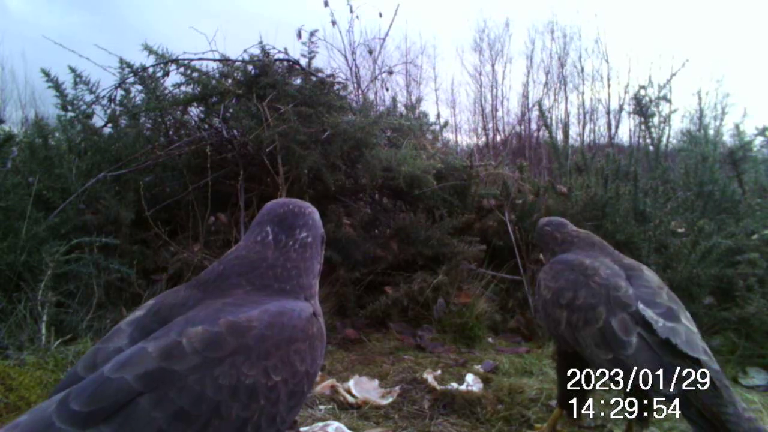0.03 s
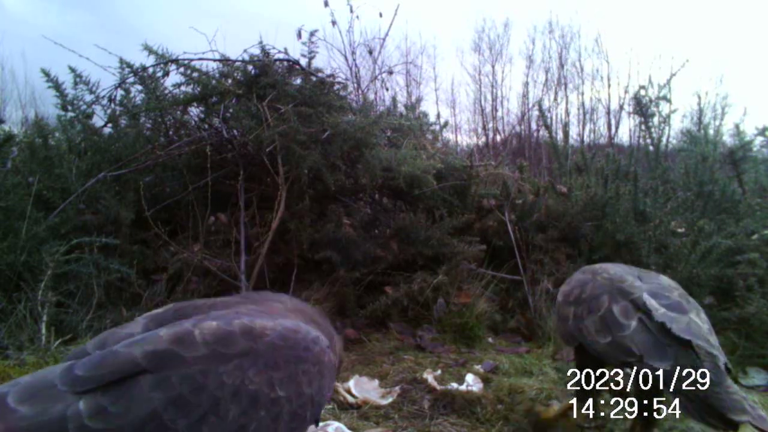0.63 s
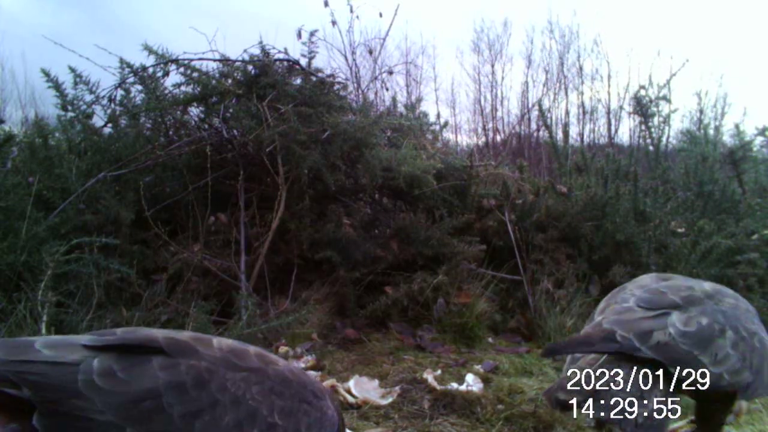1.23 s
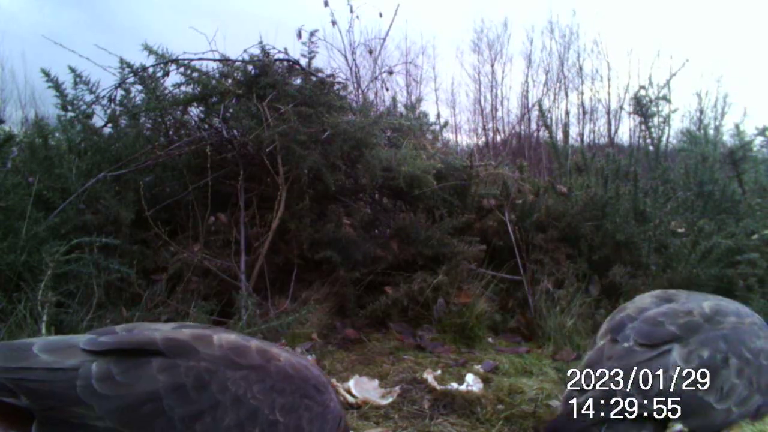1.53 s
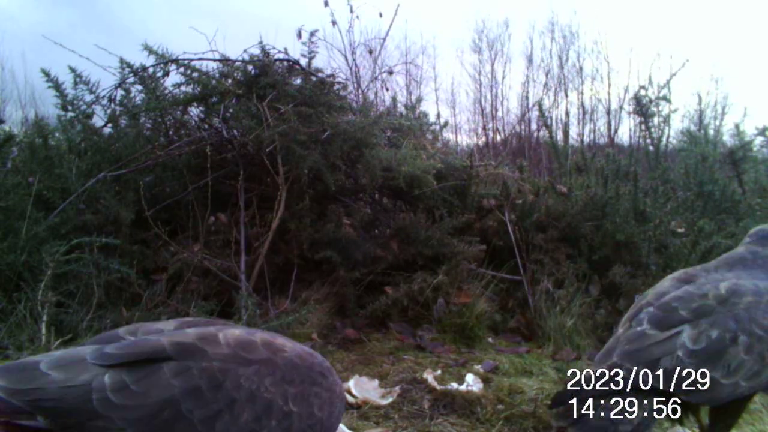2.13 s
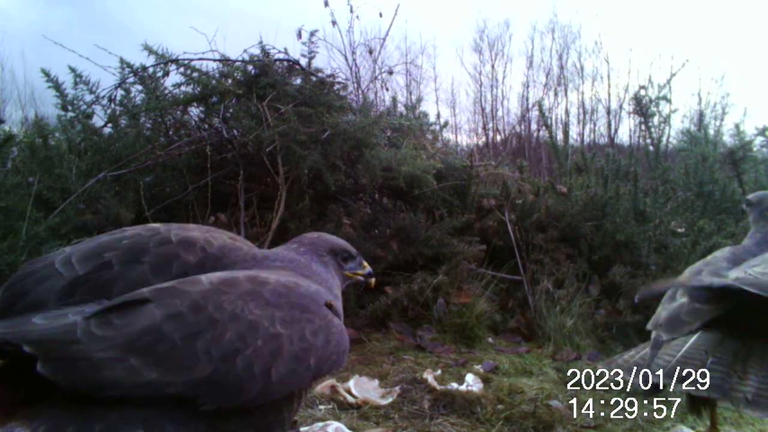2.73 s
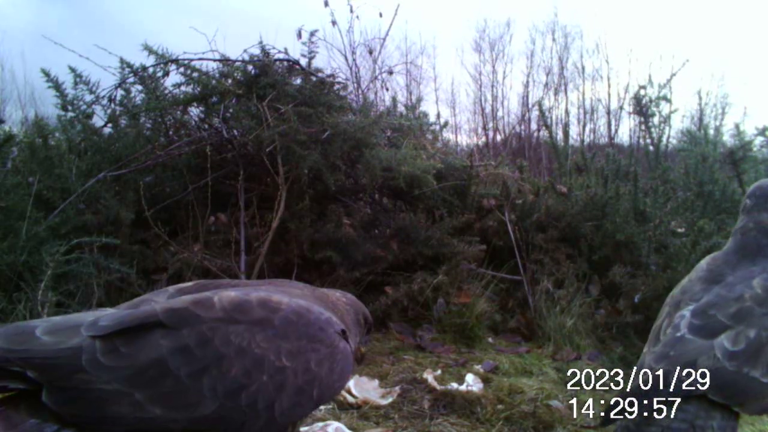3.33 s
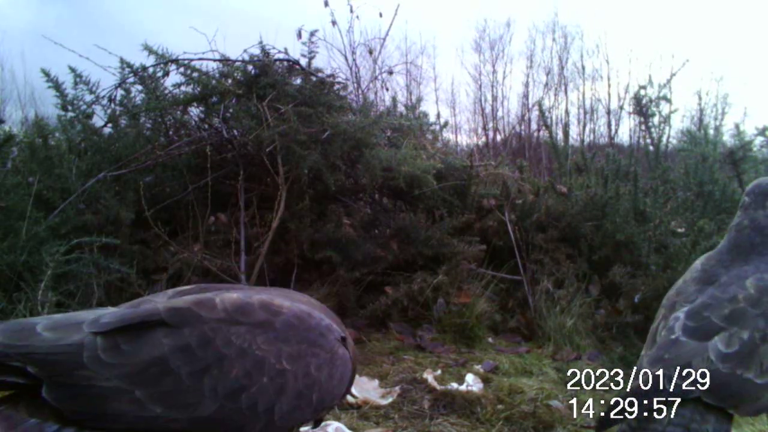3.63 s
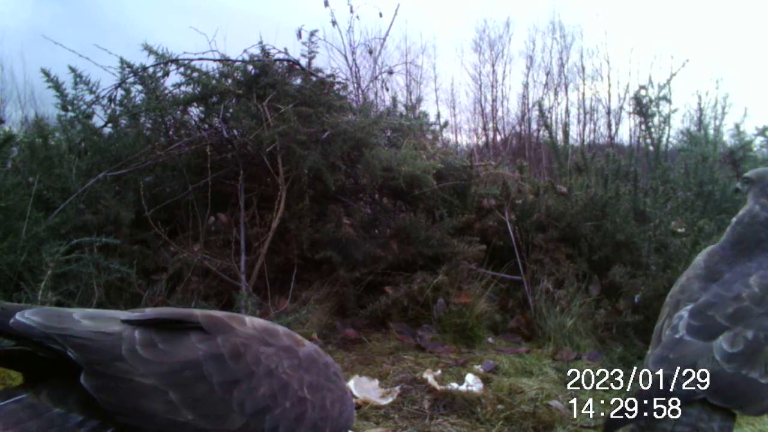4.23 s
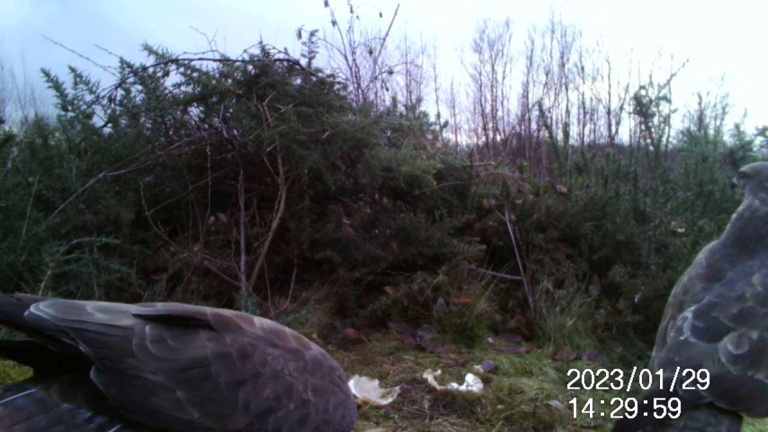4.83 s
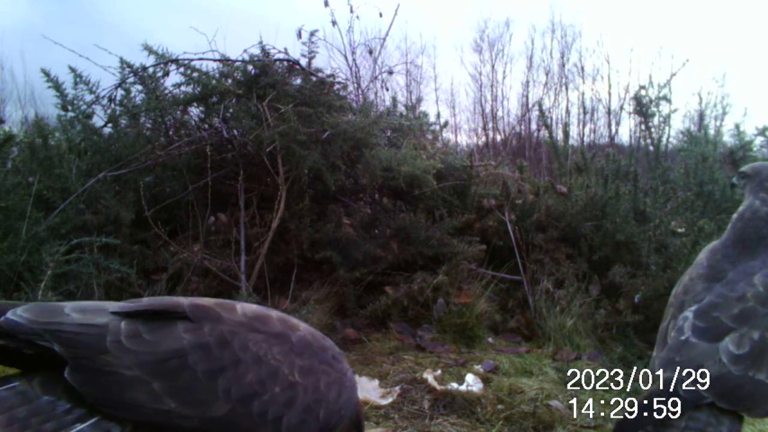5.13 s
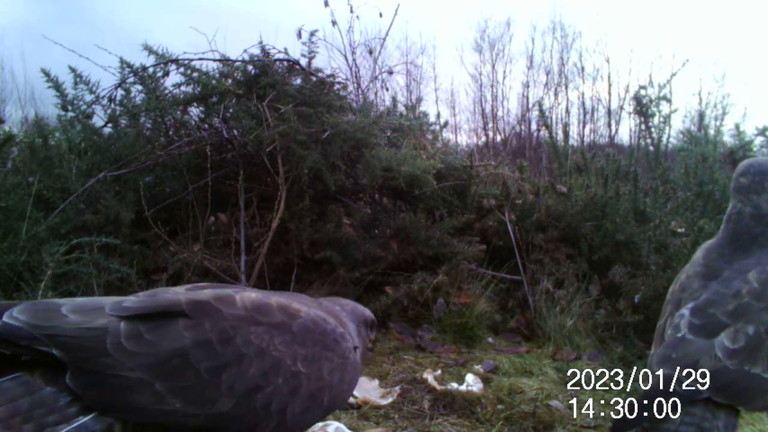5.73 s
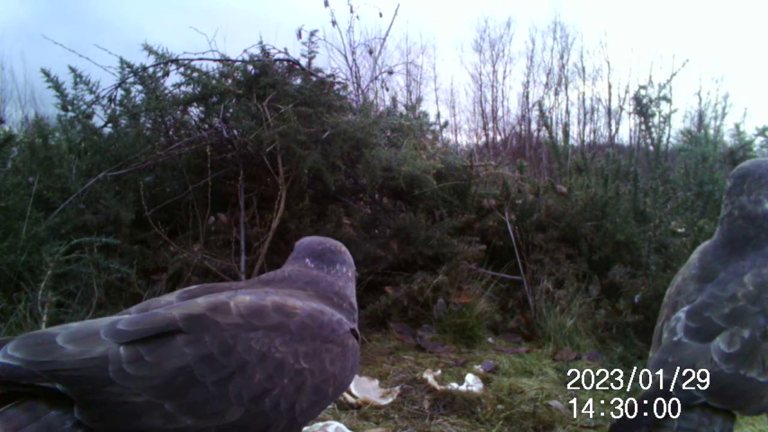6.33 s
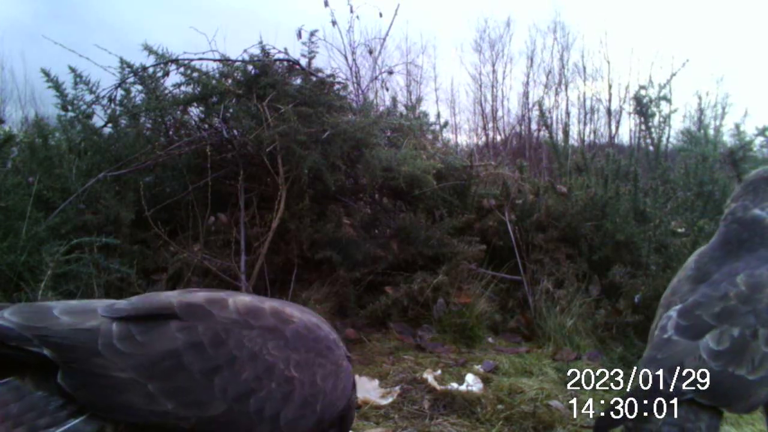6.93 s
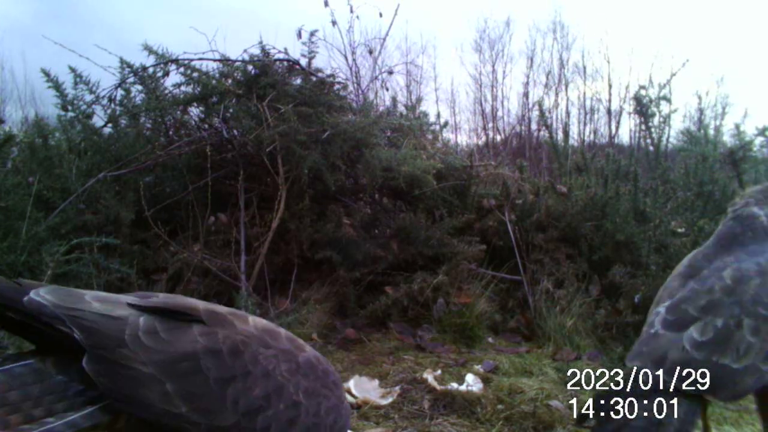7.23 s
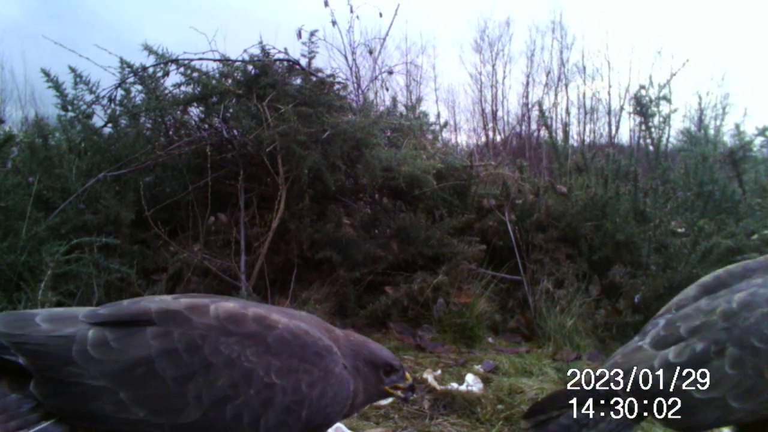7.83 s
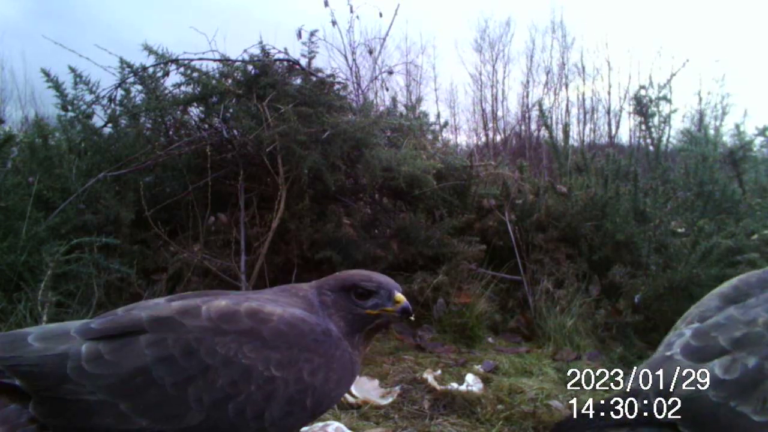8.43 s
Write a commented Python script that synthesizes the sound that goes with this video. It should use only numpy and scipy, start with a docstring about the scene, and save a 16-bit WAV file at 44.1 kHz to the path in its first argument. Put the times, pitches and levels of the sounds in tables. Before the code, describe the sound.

A steady wind-like rush and low rumble fill an outdoor clearing. A small bird peeps faintly far off. Feathers rustle briefly and a buzzard near the microphone gives one soft, high mew. A few tiny beak or twig ticks follow. Near the end the buzzard lets out a hoarse rising squeal, then a louder, harsh, rattling scream. The sound is slightly dull and lo-fi.

```python
"""Two buzzards feeding in a clearing

Over a steady wind-like rush, a buzzard close by gives a soft mew, later a rising squeal and a harsh
scream: each a whistle that a flutter of the syrinx chops into pulses. Feathers rustle, a beak ticks,
a small bird peeps far off. The bushes echo the calls faintly, and a low sample rate dulls the top."""
import sys
import numpy as np
from scipy import signal
from scipy.fft import rfft, irfft, next_fast_len
from scipy.io import wavfile
from scipy.ndimage import uniform_filter1d

SR = 44100
rng = np.random.default_rng(int(sys.argv[2]) if len(sys.argv) > 2 else 0)


def persist_wave(psi):
    """Save psi, clipped to +-1, as 16-bit WAV."""
    counts = np.round(np.clip(psi, -1, 1) * 32767).astype(np.int16)
    wavfile.write(sys.argv[1], SR, np.atleast_2d(counts).T)


N = 373527
TIME = np.arange(N) / SR


def from_db(db):
    """Decibels to gain."""
    return 10 ** (np.asarray(db) / 20)


def rms_one(x):
    """Scale to unit power."""
    return x / np.sqrt(np.mean(x ** 2) + 1e-20)


def in_time(rows):
    """One curve at every sample for each column after the time column."""
    s, *columns = np.transpose(rows)
    return [np.interp(TIME, s, c) for c in columns]


def gate(rows, fade_s=0.0048):
    """Open while a curve lasts, with short fades outside it."""
    return np.clip(np.minimum(TIME - rows[0][0], rows[-1][0] - TIME) / fade_s + 1, 0, 1)


def drift(rate_hz):
    """A smooth random wander of unit power."""
    lowpass = signal.butter(2, rate_hz, fs=SR, output="sos")
    return rms_one(signal.sosfilt(lowpass, rng.standard_normal(N + SR))[SR:])


def resonance(x, hz, width_hz):
    """Two-pole resonance with unity gain at its peak."""
    r = np.exp(-np.pi * width_hz / SR)
    feedback = [1, -2 * r * np.cos(2 * np.pi * hz / SR), r * r]
    return signal.lfilter(np.array([1, 0, -1]) * (1 - r * r) / 2, feedback, x + 1e-18)


def hiss(hz, width_hz):
    """Noise sent twice through one resonance."""
    return rms_one(resonance(resonance(rng.standard_normal(N), hz, width_hz), hz, width_hz))


def coloured_noise(colour):
    """Noise with the given spectrum and nothing above its last point."""
    size = next_fast_len(N)
    hz = np.arange(size // 2 + 1) * SR / size
    points_hz, points_db = np.transpose(colour)
    gain = from_db(np.interp(np.log(hz + 1), np.log(points_hz), points_db)) * (hz < points_hz[-1])
    return rms_one(irfft(rfft(rng.standard_normal(size)) * gain, size)[:N])


def background(hum_hz=60.75, hum_db=-47):
    """The bed: a steady mid-range rush over a low rumble and a faint wavering hum."""
    # Slow changes in the bed. Each row: time in seconds, rush level in dB, rumble level in dB.
    levels = [(0, -27.5, -31), (.5, -26.5, -33), (1.6, -27, -33), (2.25, -27.5, -34), (2.7, -26.5, -34.5),
              (3.3, -27, -34), (4.3, -27.5, -34.5), (5.4, -27, -35), (7.2, -27.5, -34.5), (8.47, -27, -35)]
    # Tone of the two noises. Each row: frequency in Hz, relative level in dB.
    rush_colour = [(300, -22.5), (520, -15), (620, -10), (730, -3.5), (910, 1), (1200, -2.5), (1500, -.5),
                   (1780, -2), (2150, -10), (2600, -16), (3300, -22), (4100, -29.5), (5100, -32.5),
                   (5500, -37)]
    rumble_colour = [(12, -9), (25, -3), (42, -2), (75, 0), (110, -4.5), (160, -7.5), (270, -9),
                     (360, -14.5), (450, -14.5), (540, -24.5), (900, -42.5)]
    rush_db, rumble_db = in_time(levels)
    rush = from_db(rush_db) * coloured_noise(rush_colour)
    rumble = from_db(rumble_db) * coloured_noise(rumble_colour)
    hum_phase = 2 * np.pi * np.cumsum(hum_hz + 2.3 * drift(4)) / SR
    return rush + rumble + from_db(hum_db) * np.sqrt(2) * np.sin(hum_phase)


def small_bird(hz=4183.7, rise_10_db_s=0.004177, t60_s=0.1305):
    """Thin, distant peeps on one pitch that swell quickly and die away."""
    # Each row: time of a peep's peak in seconds, level in dB.
    peeps = [(.069, -46.5), (.101, -47), (.195, -52)]
    envelope = np.zeros(N)
    for s, level_db in peeps:
        below_peak_db = np.maximum((s - TIME) / rise_10_db_s * 10, (TIME - s) / t60_s * 60)
        envelope += from_db(level_db - np.minimum(below_peak_db, 200))
    return envelope * np.sqrt(2) * np.sin(2 * np.pi * hz * TIME)


def feathers():
    """Feathers slide over each other in quick, uneven brushes as a bird shifts its wings."""
    # Each row: time in seconds, rustle level in dB.
    rustle = [(2.1, -75), (2.28, -67.5), (2.35, -52.5), (2.41, -65.5), (2.45, -57.5), (2.58, -73.5),
              (2.68, -54), (2.78, -68)]
    level_db, = in_time(rustle)
    return from_db(level_db + 3 * drift(90)) * gate(rustle) * hiss(4800, width_hz=2200)


def ticks(attack_s=0.00089):
    """Beak and twigs give tiny cracks that die within milliseconds."""
    # Each row: start in seconds, level in dB, pitch in Hz, seconds to fall by 60 dB.
    cracks = [(2.188, -44.5, 5300, 0.017), (2.2121, -37.5, 4000, .013), (2.5475, -40, 4764, 0.01936),
              (4.4026, -30.5, 4989, 0.01302), (5.3328, -41.5, 3800, .012), (6.254, -39.5, 3596, .01)]
    out = np.zeros(N)
    for s, level_db, hz, t60_s in cracks:
        age = np.maximum(TIME - s, 0)
        envelope = np.minimum(age / attack_s, 1) * from_db(-60 * np.minimum(age / t60_s, 2))
        out += from_db(level_db) * envelope * hiss(hz, width_hz=1200)
    return out


def bushes(x):
    """The scrub throws back a few weak reflections."""
    # Each row: delay in seconds, echo level in dB.
    echoes = [(0.02, -34.5), (.047, -37.5), (.083, -43.5), (.135, -42)]
    return sum(from_db(level_db) * np.interp(TIME - s, TIME, x, left=0) for s, level_db in echoes)


def syrinx(call, rough, flutter_hz, chop, swing_hz, lag, jitter, uneven_db, rasp_db, waver_hz):
    """The buzzard's voice: a whistle whose loudness and pitch swing with every flutter."""
    pitch_hz, level_db = in_time(call)
    # the rougher the call, the less regular the flutter
    cycles = np.cumsum(flutter_hz * np.exp(jitter * np.sqrt(rough) * drift(160))) / SR
    flutter_phase = 2 * np.pi * cycles
    opening = 1 - np.clip(chop * rough, 0, 1) * np.cos(flutter_phase)
    # every pulse has a strength and a pitch of its own
    pulse = cycles.astype(int) % SR
    per_pulse = rng.uniform(-0.91, 1, (SR, 2))[pulse].T
    strength, detune = uniform_filter1d(per_pulse, size=40, axis=1)
    opening *= from_db(uneven_db * np.sqrt(rough) * strength)
    opening /= np.sqrt(uniform_filter1d(opening ** 2, size=700) + 1e-9)  # hold the power steady
    hz = pitch_hz + rough * (waver_hz * detune - swing_hz * np.cos(flutter_phase - lag))
    envelope = np.sqrt(2) * from_db(level_db) * opening
    envelope /= (1 + (envelope / .76) ** 6) ** (1 / 6)  # the membrane can swing only so far
    whistle = envelope * np.sin(2 * np.pi * np.cumsum(hz) / SR)
    # turbulence at the syrinx rings in the throat
    rasp = from_db(level_db + rasp_db) * rough * np.sqrt(opening) * hiss(5300, width_hz=830)
    return gate(call) * (whistle + rasp)


def mew(settled_hz=346.35, start_extra_hz=380.44, settle_s=0.056):
    """A soft arched note, hoarse with a flutter that starts fast and settles."""
    # Each row: time in seconds, pitch in Hz, level in dB.
    call = [(2.645, 3340, -46), (2.66, 3230, -40.5), (2.683, 3761, -34), (2.718, 4026, -34.5),
            (2.762, 3892, -31.5), (2.8, 3864, -35), (2.86, 3887, -36.5), (2.905, 3838, -36),
            (2.953, 3300, -41.5)]
    # How deeply the flutter bites. Each row: time in seconds, roughness from 0 to 1.
    roughness = [(2.66, 0.02), (2.703, 0.5), (2.72, 0.13), (2.848, 0.5), (2.87, 0.13)]
    rough, = in_time(roughness)
    age = np.maximum(TIME - call[0][0], 0)
    flutter_hz = settled_hz + start_extra_hz * np.exp(-age / settle_s)
    return syrinx(call, rough, flutter_hz, chop=.985, swing_hz=390, lag=.1,
                  jitter=.1, uneven_db=4, rasp_db=-25.5, waver_hz=130)


def squeal():
    """A rising whistle that turns hoarse as it climbs and ends in a falling yelp."""
    # The climb and the yelp. Each row: time in seconds, pitch in Hz, level in dB.
    rise_call = [(7.012, 2779, -44.5), (7.06, 3858, -31), (7.097, 4012, -23.5), (7.118, 4170, -17.5),
                 (7.148, 4202, -33), (7.18, 4540, -26), (7.215, 4550, -42), (7.255, 4835, -22),
                 (7.295, 4903, -14.5), (7.34, 4871, -16), (7.369, 5300, -15), (7.381, 5030, -15),
                 (7.388, 5490, -34.5), (7.424, 5471, -36.5)]
    yelp_call = [(7.429, 5080, -29.5), (7.4325, 4588, -17.5), (7.435, 4332, -14.5), (7.438, 4100, -33),
                 (7.444, 3402, -36.5)]
    # Hoarseness of the climb. Each row: time in seconds, roughness from 0 to 1.
    roughness = [(7.06, .22), (7.11, .02), (7.125, .05), (7.14, .65), (7.19, 0.723), (7.21, .18),
                 (7.25, 0.3949), (7.38, 0.2704)]
    rough, = in_time(roughness)
    rise = syrinx(rise_call, rough, flutter_hz=322, chop=.62, swing_hz=384.8, lag=.77,
                  jitter=.23, uneven_db=4, rasp_db=-15, waver_hz=170)
    yelp = syrinx(yelp_call, rough=.34, flutter_hz=267, chop=.9, swing_hz=341.4, lag=.9,
                  jitter=.22, uneven_db=6, rasp_db=-17, waver_hz=170.7)
    return rise + yelp


def overtone(hz=5500.1, waver_hz=230.27, flicker_db=3):
    """The other side of the syrinx breaks into the scream with a shrill, unsteady whistle."""
    # Each row: time in seconds, peak level in dB around which the whistle flickers.
    levels = [(7.686, -44.5), (7.694, -20.5), (7.718, -25.5), (7.74, -12), (7.75, -54), (7.81, -41.5),
              (7.858, -16.5), (7.88, -25), (8.055, -28)]
    level_db, = in_time(levels)
    whistle = np.sin(2 * np.pi * np.cumsum(hz + waver_hz * drift(399)) / SR)
    return from_db(level_db + flicker_db * np.tanh(drift(300))) * gate(levels) * whistle


def open_beak(x, cutoff_hz=4170):
    """The wide-open beak radiates only the top of the voice."""
    return signal.sosfilt(signal.butter(7, cutoff_hz, "high", fs=SR, output="sos"), x + 1e-18)


def scream(start_flutter_hz=335, rattle_hz=232, rattle_from_s=7.77, glide_s=0.016):
    """The loudest call, forced through a wide-open beak; part-way the flutter slows to a rattle."""
    # Each row: time in seconds, pitch in Hz, level in dB driving the syrinx.
    call = [(7.662, 3305, -24), (7.689, 4396, -12.5), (7.712, 4517, -15.5), (7.739, 4982, -11.5),
            (7.778, 4646, -15.5), (7.832, 4821, -13), (7.874, 5120, -24), (7.908, 4930, -10.5),
            (7.924, 5040, -19.5), (7.939, 4886, -8), (7.978, 5054, -24), (7.987, 4895, -4.5),
            (7.996, 4945, -14), (8.044, 4884, -11.5), (8.056, 4713, -1), (8.069, 3975, -28.5)]
    # How deeply the flutter bites. Each row: time in seconds, roughness from 0 to 1.
    roughness = [(7.662, 0.13394), (7.69, 0.554), (7.738, .6), (7.75, 0.2097), (7.795, 0.33), (7.85, .9),
                 (7.99, 0.65), (8.04, 0.8886), (8.06, 0.84)]
    rough, = in_time(roughness)
    rattling = (1 + np.tanh((TIME - rattle_from_s) / glide_s)) / 2
    flutter_hz = start_flutter_hz + (rattle_hz - start_flutter_hz) * rattling
    voice = syrinx(call, rough, flutter_hz, chop=.9315, swing_hz=210, lag=1.6,
                   jitter=.23, uneven_db=6, rasp_db=-17.5, waver_hz=179.52)
    return open_beak(voice)


def scene():
    """The calls, their echoes and the small noises of the clearing over the bed, in mono."""
    calls = mew() + squeal() + scream() + overtone()
    return (calls + bushes(calls) + small_bird() + ticks() + feathers() + background())[None]


def record(dry):
    """Lo-fi finish: quarter-rate sampling mirrors the top notes faintly upward; loud peaks clip."""
    sampled = 4 * dry * (np.arange(N) % 4 == 0)
    smoothing = signal.firwin(135, SR / 8, window=("kaiser", 9), fs=SR)
    dulled = signal.fftconvolve(sampled, smoothing[None], mode="same")
    clipped = np.clip(dulled, -.71, .71)
    high_cut = signal.cheby2(12, 70, 16000, fs=SR, output="sos")
    return signal.sosfilt(high_cut, clipped)


dry = scene()
out = record(dry)
persist_wave(out)
```